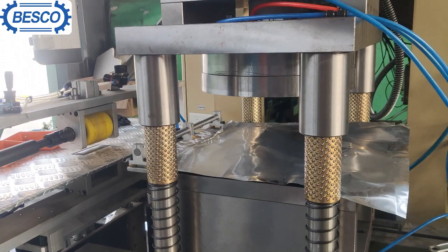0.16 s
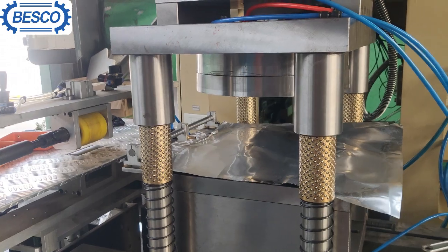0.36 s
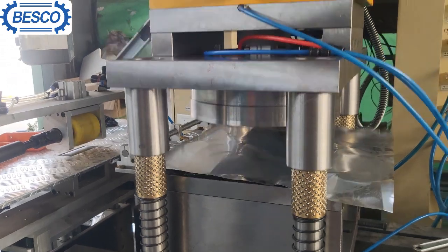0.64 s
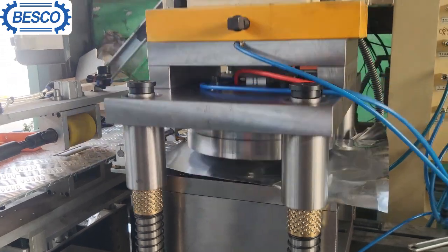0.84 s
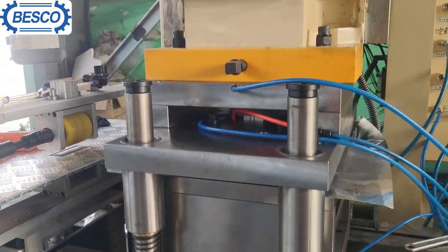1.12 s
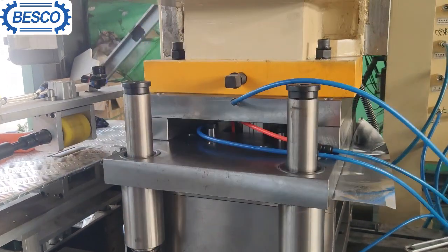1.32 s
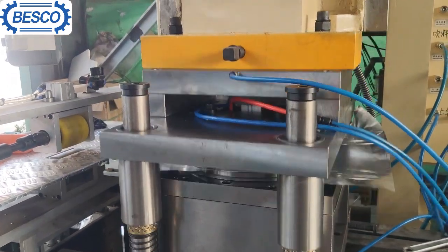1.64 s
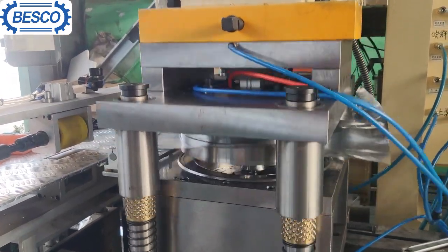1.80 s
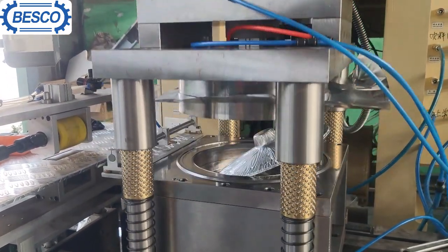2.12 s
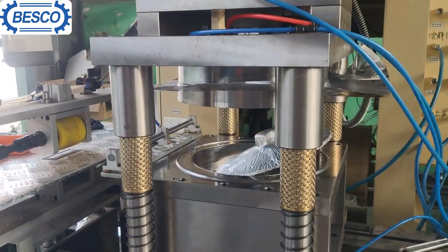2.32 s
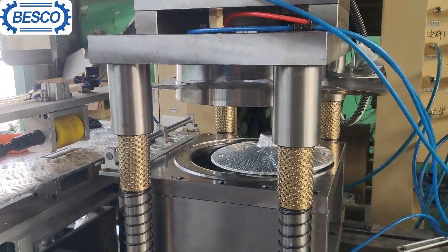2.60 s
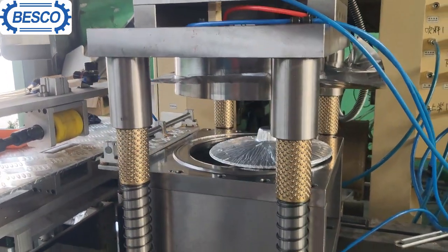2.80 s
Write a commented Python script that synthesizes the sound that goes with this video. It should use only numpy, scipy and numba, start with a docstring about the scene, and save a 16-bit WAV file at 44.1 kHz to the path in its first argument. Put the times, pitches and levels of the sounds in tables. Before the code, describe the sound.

A punch press makes one stroke close by: it clunks into motion, crumples foil and knocks shut and open with ringing metal blows. A strong air hiss follows, ending with a thump and clatter over steady factory din.

```python
"""One stroke of a punch press forming a foil dish, close by in a noisy factory.
The clutch clunks the frame; the drive rumbles and whines. From 0.7 s the die crumples the foil,
knocks shut and open again; a limiter ducks after the hardest blows. At 1.85 s compressed air blows
the dish free. Near 2.3 s the ram stops with a thump, the valve shuts and the frame clatters.
Far machines and a whistling air leak run throughout."""
import sys
import numpy as np
from scipy import signal
from scipy.fft import rfft, irfft
from scipy.io import wavfile
from scipy.ndimage import uniform_filter1d, minimum_filter1d
from numba import njit

SR = 44100
rng = np.random.default_rng(int(sys.argv[2]) if len(sys.argv) > 2 else 0)


def materialize(psi):
    """Save the field psi as 16-bit PCM at rate SR to the path in sys.argv[1].

    A 1-D psi becomes a single channel; in a 2-D psi each row is a channel.
    """
    bounded = np.clip(np.atleast_2d(psi).T, -1, 1)
    quanta = np.round(bounded * 32767).astype(np.int16)
    wavfile.write(sys.argv[1], SR, quanta)


N = 130095
T = np.arange(N) / SR
HZ = np.maximum(np.fft.rfftfreq(N, 1 / SR), 1)


def undb(db):
    """Decibels to gain."""
    return 10 ** (np.asarray(db) / 20)


def colour(points):
    """Gain per frequency from rows of f/Hz, level/dB."""
    hz, db = np.array(points, float).T
    return undb(np.interp(np.log(HZ), np.log(hz), db))


def curve(points):
    """Gain over time from rows of t/s, level/dB."""
    return undb(np.interp(T, *np.array(points).T))


def fade(age_s, t60_s):
    """Full level until age 0, then exponential decay."""
    return np.exp(-np.log(1000) * np.maximum(age_s, 0) / max(t60_s, .005))


def pan(db):
    """Stereo gains, left over right by db."""
    return undb(np.array([[db], [-db]]) / 2)


def lean(pair, balance):
    """Pan each frequency by rows of f/Hz, left over right/dB."""
    return irfft(rfft(pair) * colour(balance) ** np.array([[.5], [-.5]]), N)


def spread(pair, gain):
    """Filter two unrelated signals, as mid and side, into stereo of rms 1."""
    # stereo width: f/Hz, side over mid/dB
    side_over_mid = [(30, 14), (65, 5.5), (120, -3.5), (300, -17.5), (650, -8), (1300, -0.5), (3000, -1),
                     (7000, -0.5), (9000, -0.5), (15000, 3)]
    width = colour(side_over_mid)
    shares = np.array([np.ones_like(HZ), width]) / np.hypot(1, width)
    mid, side = irfft(rfft(pair) * gain * shares, N)
    stereo = np.array([mid + side, mid - side])
    return stereo / np.sqrt(np.mean(stereo ** 2))


def noise():
    """Two unrelated white noises."""
    return rng.standard_normal((2, N))


def walk(rate_hz, size=N):
    """Smooth random wander, deviation about 0.7."""
    return 0.87 * np.interp(T[:size] * rate_hz, np.arange(4096), rng.standard_normal(4096))


def resonances(spacing_hz, depth_db):
    """Gain per frequency of dense, irregular resonances."""
    return undb(depth_db * np.interp(HZ / spacing_hz, np.arange(4096), rng.standard_normal(4096)))


def strike(blows, modes, crack, attack_s):
    """Each blow: a brief contact chatter in four bands, plus the ringing modes of the body."""
    # centres of bass, low-mid, mid, treble: f/Hz
    bands_hz = [240, 650, 1650, 6000]
    scatter_db, rattle_depth, rattle_hz = 3, 0.43, 55
    log_centres = np.log(bands_hz)
    body = colour(crack) * resonances(45, 5.2)
    band_gains = [np.interp(np.log(HZ), log_centres, share) for share in np.eye(4)]
    bands = np.array([spread(noise(), body * gain) for gain in band_gains])
    out = np.zeros((2, N))
    for start_s, *bands_db, hold_s, t60_s, ring_db in blows:
        first = int(start_s * SR)
        age = T[:min(N - first, SR)]
        span = slice(first, first + len(age))
        sound = np.tensordot(undb(bands_db), bands[:, :, span], 1) * fade(age - hold_s, t60_s)
        for hz, mode_db, mode_t60_s in modes:
            phase, lag, scatter = rng.uniform(-0.9, 1, 3)
            stereo_phase = np.pi * phase + np.array([[1], [-1]]) * lag * min(hz / 1600, 1.5)
            blow_db = np.interp(np.log(hz), log_centres, bands_db)
            gain = undb(blow_db + ring_db + mode_db + scatter_db * scatter)
            # loose parts make each ring waver
            sway, bend = (rattle_depth * walk(rattle_hz, len(age)) for _ in range(2))
            tone = np.sin(2 * np.pi * hz * age + stereo_phase + bend)
            sound += gain * fade(age, mode_t60_s) * (1 + sway) * tone
        out[:, span] += sound * np.minimum(age / attack_s, 1)
    return out


def die_knocks():
    """The die plates knock together and ring."""
    # t/s, bass/dB, low-mid/dB, mid/dB, treble/dB, hold/s, t60/s, ring/dB
    knocks = [(.523, -33, -29, -13.5, -30, 0.0018, 0.19, -5),
              (.778, -31, -31, -13, -21.5, 0.0032, 0.053, -12),
              (.982, -37, -29, -8, -31, 0.0027, 0.088, -11.5),
              (1.028, -18, -8, -1.5, -10, 0.011, 0.071, -13),
              (1.22, -31, -23, -14.5, -23.5, 0.0083, 0.039, -4),
              (1.279, -49, -24.5, -21.5, -26, 0.015, 0.13, -2),
              (1.559, -70, -34, -23.5, -34, 0.0058, 0.044, 2), (1.645, 3, 4, -1.5, -22, 0.0029, 0.03, -15),
              (1.651, -1, -3, -3, -17, 0.0075, 0.075, 0.5), (1.834, -15, -14, -7, -13, 0.0092, 0.03, -4.5),
              (1.945, -40, -35, -9, -17, 0.0075, 0.05, -31)]
    # die modes: f/Hz, level/dB, t60/s
    modes = [(242.6, -12, 0.45), (254.8, -6, .4), (398, -13, 0.19), (680, -21, 0.075), (755, 4, 0.13),
             (1422, 2, 0.11), (1450, 5, 0.13), (1548, -1.5, 0.12), (1620, -6, 0.11), (1888, -2, .1),
             (2056, 0, 0.15)]
    # contact spectrum: f/Hz, level/dB
    crack = [(30, -32), (100, -35), (170, -23), (235, 8), (400, -2), (800, 3.5), (1100, 4), (1500, 9.5),
             (2100, 11), (3000, 4.5), (4000, 1), (6000, 9), (7500, 5), (10000, -11), (16000, -23)]
    return strike(knocks, modes, crack, attack_s=0.0015) * pan(-1)


def frame_blows():
    """The clutch and later blows clunk the press frame and ring it."""
    # t/s, bass/dB, low-mid/dB, mid/dB, treble/dB, hold/s, t60/s, ring/dB
    blows = [(.194, -15, -13, -15.5, -19, 0.0068, 0.15, -0.5),
             (.24, -31, -20.5, -23, -30.5, .028, 0.23, -6), (1.368, -32, -20, -25, -45, 0.0085, 0.038, -12),
             (2.328, -29.5, -22.5, -17, -19.5, 0.035, 0.19, -2.5),
             (2.405, -24.5, -34, -32, -34, 0.014, 0.67, -16), (2.53, -31, -29, -27, -27.5, 0.0087, .15, 0),
             (2.58, -36, -28.5, -32, -45, .008, 0.089, 4.5)]
    # frame modes: f/Hz, level/dB, t60/s
    modes = [(185, 3, 0.21), (258, -7.5, 0.47), (290, -1.5, 0.12), (400, -4.5, 0.28), (493, -12, 0.17),
             (547, -2, 0.34), (648, -17.5, 1.0), (682, -4, 0.83), (727, 5.5, 0.16), (960, -10.5, 0.42),
             (1045, 0.5, 0.12), (1170, -12.5, 0.27), (1273, -8.5, .35), (1783, -7.5, 0.23),
             (1770, -11, 0.33)]
    # contact spectrum: f/Hz, level/dB
    crack = [(30, -38), (100, -8), (150, -1.5), (190, -4), (245, -4), (310, 1), (450, -1), (560, 4),
             (740, -1.5), (880, -2.5), (1100, -0.5), (1700, 10.5), (2300, 7.5), (3000, 1.5), (4000, -1),
             (6000, 8), (7500, 4.5), (10000, -19), (16000, -24)]
    return strike(blows, modes, crack, attack_s=0.004)


def foil():
    """The sheet crinkles under the die in dense clicks, with a few bright scrapes."""
    # crumpling and sliding: t/s, level/dB
    envelope = [(.70, -39.5), (.745, -14.5), (.79, -15), (.825, -17.5), (.862, -17), (.915, -20.5),
                (.96, -13.5), (1.01, -14), (1.045, -9.5), (1.08, -16.5), (1.15, -18.5), (1.3, -21),
                (1.4, -28), (1.53, -29.5), (1.61, -17), (1.7, -25.5), (1.8, -16.5), (1.87, -17.5),
                (2.0, -20.5), (2.3, -32), (2.6, -32), (2.9, -36.5)]
    # f/Hz, level/dB
    crinkle_spectrum = [(100, -56), (300, -22.5), (550, -9), (800, -0.5), (1100, -4.5), (1500, 2),
                        (2100, -1.5), (3000, -10), (4200, -19), (6500, -14), (9000, -37), (16000, -69)]
    # t/s, half length/s, level/dB
    scrapes = [(0.745, 0.012, -27), (1.029, 0.03, -15.5), (1.62, 0.051, -28.5)]
    # f/Hz, level/dB
    scrape_spectrum = [(1500, -30), (3000, -4), (5500, 5.5), (7300, 7), (9500, -12), (16000, -38)]
    crinkles_per_s, scatter_db = 4000, 1.5
    clicks = (rng.random((2, N)) < crinkles_per_s / SR) * np.sign(noise())
    clicks *= undb(scatter_db * np.minimum(rng.exponential(size=(2, N)), 5))
    crinkle = spread(clicks, colour(crinkle_spectrum) * resonances(40.17, 1.95))
    crinkle *= curve(envelope) * undb(0.43 * walk(70))
    swells = sum(undb(db) * np.exp(-((T - at_s) / half_s) ** 2 / 2) for at_s, half_s, db in scrapes)
    scrape = swells * spread(noise(), colour(scrape_spectrum)) * undb(1.6 * walk(88.6))
    return crinkle * pan(-2.7) + scrape


def air_blast():
    """The jet gushes out, builds up, flutters over the dish and dies when the valve shuts."""
    # jet: f/Hz, level/dB
    spectrum = [(40, -13), (100, -14), (200, -8), (500, -10), (1200, -4.5), (2300, -2.5), (3100, -10.5),
                (4000, -7), (5000, -0.5), (6200, 0.5), (7200, 4.5), (8500, -3), (10000, -13.5),
                (11500, -9.5), (12500, -23), (14500, -11), (15800, -30)]
    # f/Hz, left over right/dB
    balance = [(60, -12), (110, -19), (200, 14), (380, 16), (700, 5), (1290, 1), (2380, -1.5), (4400, -5),
               (8120, 1.5), (15000, -0.5)]
    open_s, rise_s, build_s, close_s, t60_s, level_db = 1.85, 0.039, 0.3, 2.325, .36, -14.5
    age = T - open_s
    pressure = np.interp(age, [0, build_s], [0.75, 1])
    flow = np.clip(age / rise_s, 0, 1) * pressure * fade(T - close_s, t60_s)
    jet = lean(spread(noise(), colour(spectrum) * resonances(60, 2.3)), balance)
    return jet * flow * undb(level_db + 1.7 * walk(60))


def ram_stop():
    """A low, heavily damped thump as the ram comes to rest."""
    stop_s, swell_s, pitch_hz, level_db = 2.284, 0.0107, 195.6, -9
    age = np.maximum(T - stop_s, 0)
    rise = age / swell_s
    envelope = rise * np.exp((1 - rise ** 2) / 2)
    thud = spread(noise(), colour([(30, -23), (100, -4), (280, 1.5), (500, -9.5), (2000, -56)]))
    return undb(level_db) * envelope * (np.sin(2 * np.pi * pitch_hz * age) + 0.6 * thud)


def drive():
    """The moving ram and gears rumble through the frame."""
    # rumble: t/s, level/dB
    envelope = [(.18, -38.5), (.25, -20.5), (.42, -30), (.7, -30), (.76, -30), (.9, -30), (1.16, -18),
                (1.3, -29), (1.45, -28), (1.6, -28), (1.78, -23.5), (1.9, -24), (2.25, -29), (2.37, -19),
                (2.5, -24), (2.7, -27.5), (2.95, -33.5)]
    # rumble: f/Hz, level/dB
    spectrum = [(25, -26), (60, -11), (100, -10), (145, -6), (190, -1), (250, 2.5), (310, 1), (390, 0),
                (460, -3), (560, 0.5), (700, -4), (1000, -3), (2000, -5), (4000, -21), (10000, -49)]
    rumble = spread(noise(), colour(spectrum) * resonances(24.86, 3.1))
    return rumble * curve(envelope) * undb(2.0 * walk(45))


def drive_whine():
    """A rough, narrow hum near 660 Hz starts with the clutch and slowly fades."""
    start_s, pitch_hz, width_hz, level_db, t60_s = 0.193, 664, 160, -27, 2.84
    age = T - start_s
    band = 1 / (1 + (2 * (HZ - pitch_hz) / width_hz) ** 2)
    return spread(noise(), band) * undb(level_db) * np.clip(age / .01, 0, 1) * fade(age, t60_s)


def air_leak():
    """A steady, faintly whistling hiss, a little louder while the ram is down."""
    # hiss: f/Hz, level/dB
    spectrum = [(3000, -64), (5000, -12.5), (6000, -4.5), (6500, 0.5), (7300, 0.5), (8200, -7),
                (10000, -14), (11500, -11.5), (13000, -21), (15500, -17)]
    # whistle peaks and dips: f/Hz, width/Hz, gain/dB
    peaks = [(4557, 30, 2), (6760, 50, 2.5), (6140, 40, -1.5), (6740, 40, 1), (6993, 88, 7.5),
             (7540, 19, -4.5), (7530, 40, 8)]
    # f/Hz, left over right/dB
    balance = [(60, 1.5), (110, 3.5), (200, 1.5), (380, 0.5), (700, -0.5), (1290, -1.0), (2380, -2.5),
               (4400, 0), (8120, 5), (15000, -1)]
    # t/s, gain/dB
    swell = [(.1, -1), (1.1, -0.5), (1.3, 2), (1.6, 1), (2.0, 1.5), (2.9, -1.5)]
    whistles = undb(sum(db / (1 + (2 * (HZ - hz) / width_hz) ** 2) for hz, width_hz, db in peaks))
    hiss = spread(noise(), colour(spectrum) * whistles * resonances(50, 2.8))
    hiss *= undb(-30.5 + 0.27 * walk(25))
    return lean(hiss, balance) * curve(swell)


def far_machines():
    """The steady din of distant machines in the hall."""
    # din: f/Hz, level/dB
    spectrum = [(18, -35), (30, -7), (106, 3.5), (126, -5.5), (309, -13.5), (391, 1), (465, -24),
                (506, -8.5), (2260, -12.5), (3950, -13), (5000, -19.5), (6500, -50), (11000, -120)]
    din = spread(noise(), colour(spectrum) / np.hypot(1, (HZ / 5000) ** 3))
    return din * undb(-37.5 + walk(21)) * pan(-1.6)


def hall_echo(x):
    """Dull reverberation: convolution with a decaying noise tail."""
    # f/Hz, level/dB
    spectrum = [(60, 7), (250, 10.5), (800, 19), (2000, -8), (5000, -36), (15000, -27)]
    tail = spread(noise(), colour(spectrum)) * fade(T, t60_s=0.54) * np.clip(T / 0.039, 0, 1)
    return signal.fftconvolve(x, tail / np.sqrt(np.sum(tail ** 2) * 4), axes=1)[:, :N]


def scene():
    """The press and its echo over the factory."""
    press = frame_blows() + die_knocks() + ram_stop() + foil()
    echo = undb(-15) * hall_echo(press)
    return press + echo + drive() + air_blast() + far_machines() + air_leak() + drive_whine()


@njit
def recover(wanted, step):
    """Gain that drops at once and creeps back up."""
    out, gain = np.empty(len(wanted)), 1.
    for i in range(len(wanted)):
        gain = min(wanted[i], gain + (1 - gain) * step)
        out[i] = gain
    return out


def limiter_gain(x):
    """Ducks when the louder channel passes the ceiling, holds, then recovers."""
    ceiling, sense_s, hold_s, release_s = 0.79, 0.00076, 0.043, 0.086
    power = uniform_filter1d((x ** 2).max(axis=0), int(sense_s * SR))
    wanted = np.minimum(1, ceiling / np.sqrt(np.abs(power) + 1e-12))
    half_hold = int(hold_s * SR / 2)
    held = minimum_filter1d(wanted, 2 * half_hold + 1, origin=half_hold)
    released = recover(held, 1 / (release_s * SR))
    return uniform_filter1d(minimum_filter1d(released, size=65), size=65)


def record(dry):
    """Limiter, fade-in, soft clip, treble dulled above about 12 kHz, low-pass."""
    # top-end roll-off: f/Hz, gain/dB
    roll_off = [(11400, 0), (12200, -24.5), (15800, -8.5)]
    start_s, cutoff_hz = 0.036, 15800
    limited = dry * limiter_gain(dry) * np.clip((T - start_s) / 0.009, 0, 1)
    rounded = limited / (1 + limited ** 8) ** (1 / 8)
    dulled = irfft(rfft(rounded) * colour(roll_off), N)
    return signal.sosfilt(signal.ellip(8, .2, 70, cutoff_hz, fs=SR, output="sos"), dulled)


dry = scene()
out = record(dry)
materialize(out)
```